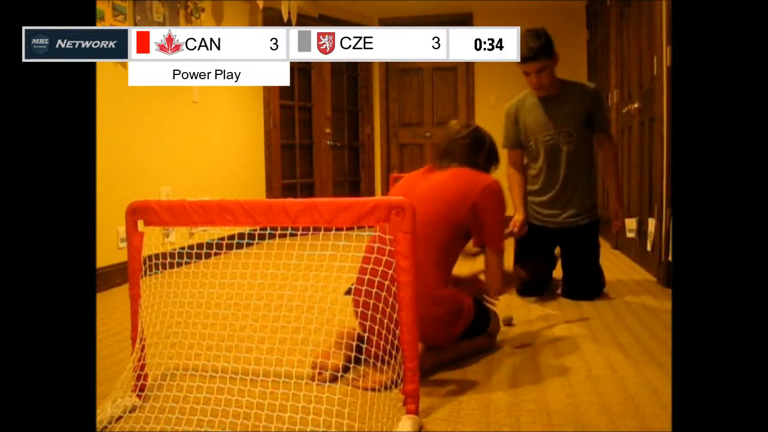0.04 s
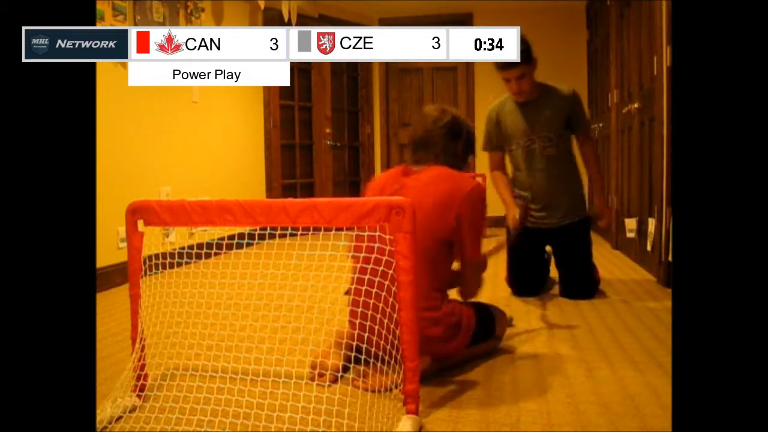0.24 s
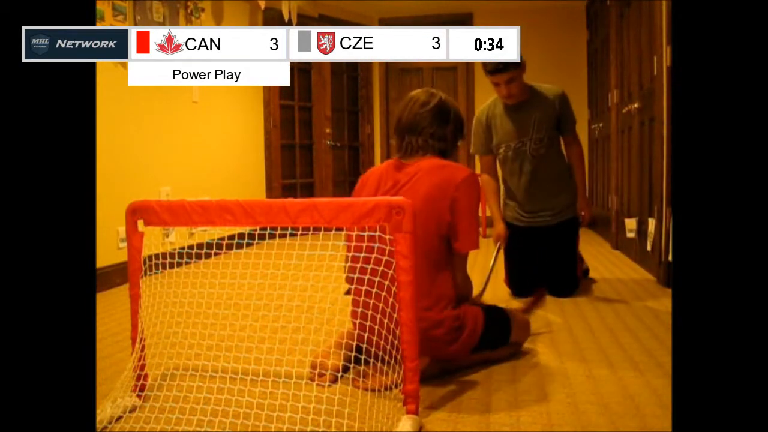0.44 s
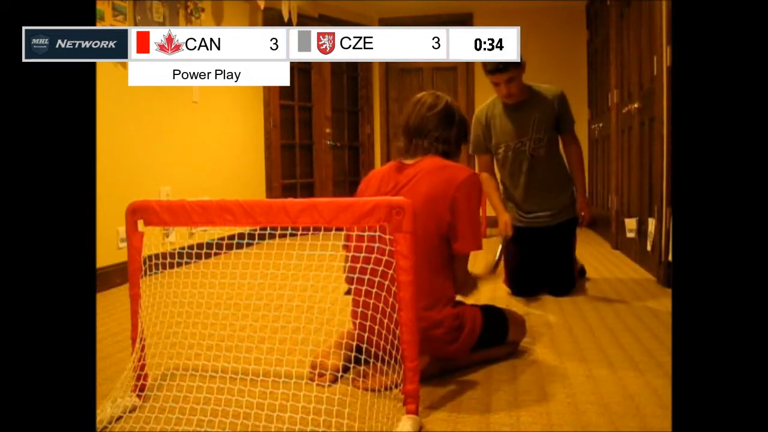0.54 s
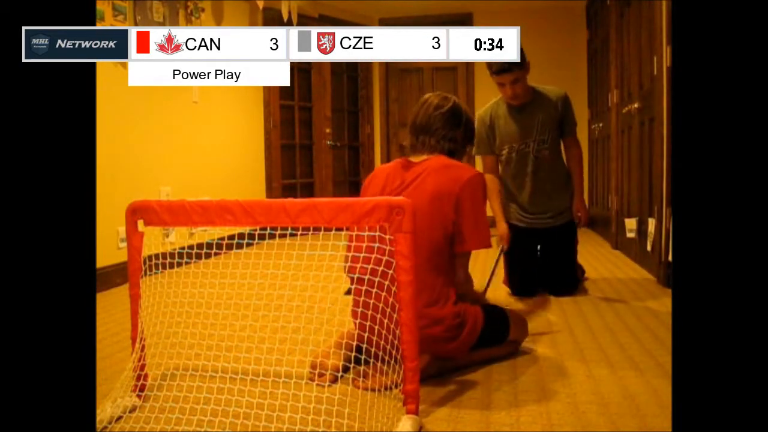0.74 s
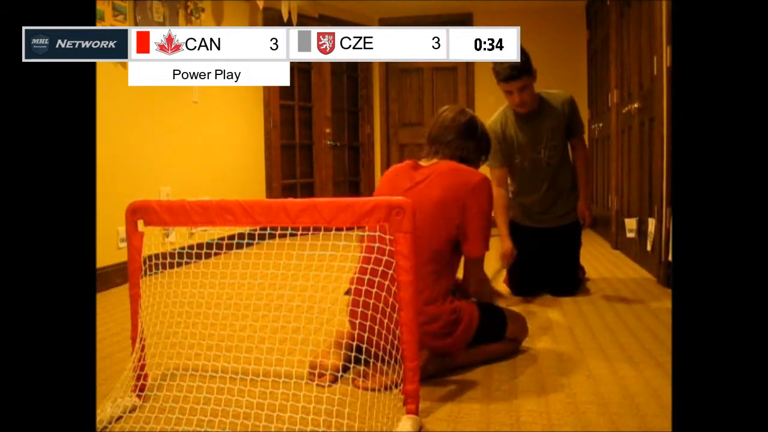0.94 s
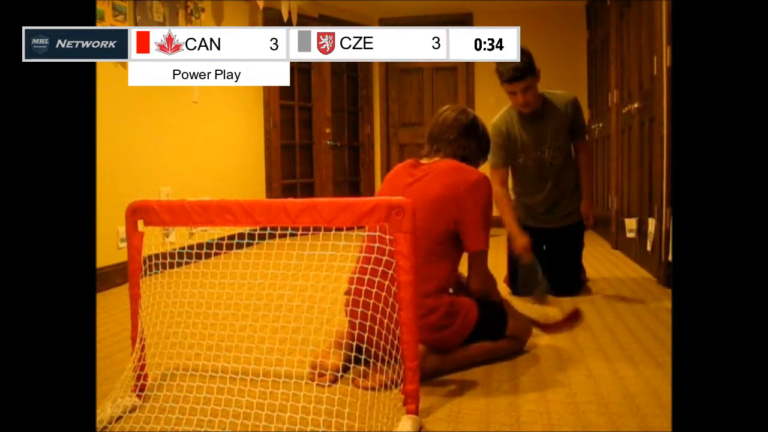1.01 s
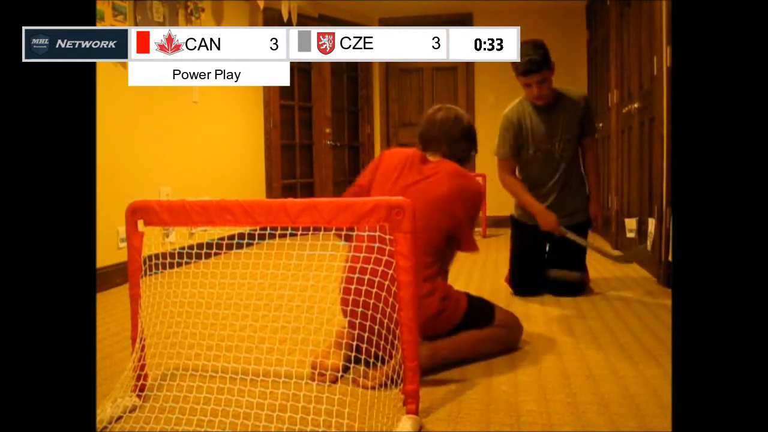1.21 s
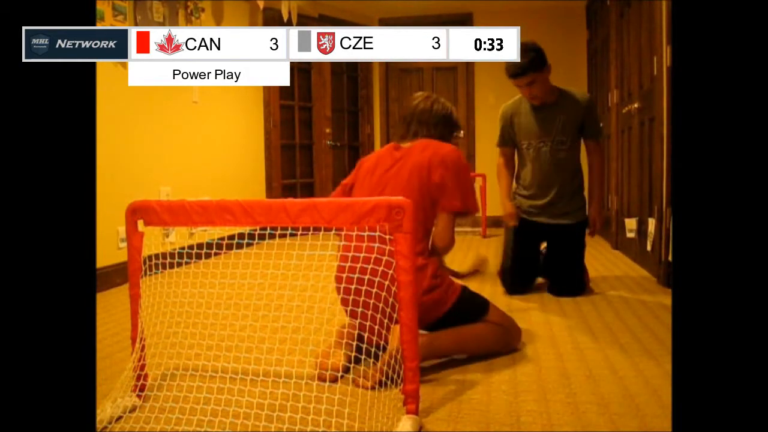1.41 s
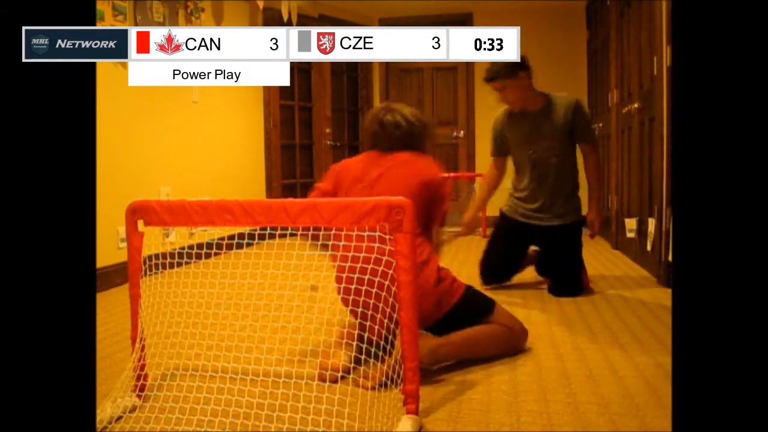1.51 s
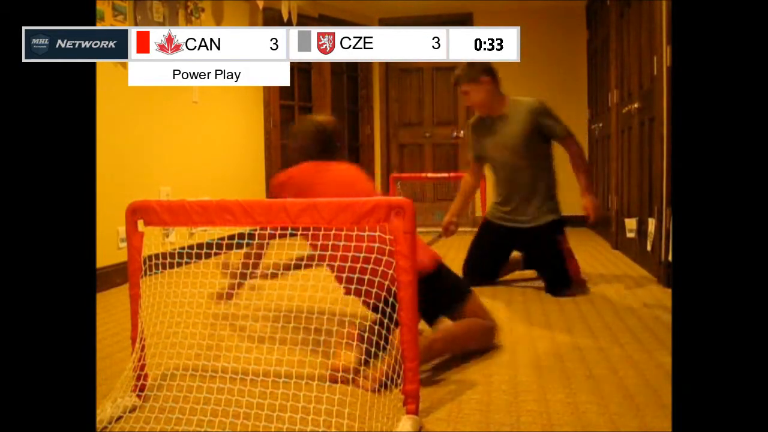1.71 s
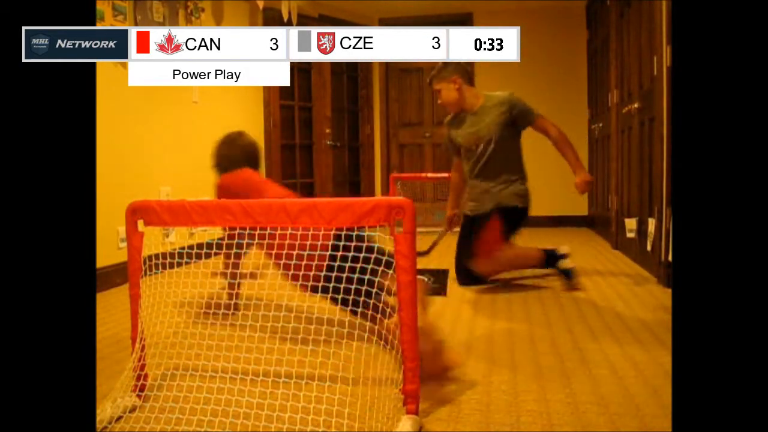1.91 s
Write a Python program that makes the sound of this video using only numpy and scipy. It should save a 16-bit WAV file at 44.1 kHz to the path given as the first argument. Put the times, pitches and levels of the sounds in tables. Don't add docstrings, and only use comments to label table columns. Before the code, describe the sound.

Small plastic hockey sticks strike each other in four bright, sharp cracks with short rattles, between soft knee and blade thuds on carpet, cloth rustling at first and again at the end, in a lively hallway, close camera microphone.

```python
import sys
import numpy as np
from scipy import signal
from scipy.fft import rfft, irfft
from scipy.io import wavfile
from scipy.ndimage import uniform_filter1d, map_coordinates

SR = 44100
rng = np.random.default_rng(int(sys.argv[2]) if len(sys.argv) > 2 else 0)


def gain_from_db(level_db):
    decades = np.asarray(level_db, float) / 20
    return 10 ** decades


def dump_mix(stems):
    frames = np.atleast_2d(stems).T
    limited = np.clip(frames, -1, 1)
    pcm = np.round(limited * 32767).astype(np.int16)
    wavfile.write(sys.argv[1], SR, pcm)


N = 85995


def unit(x):
    return x / np.sqrt(np.mean(x ** 2) + 1e-20)


def along(points, hz):
    f, v = np.transpose(points)
    return np.interp(np.log(hz + 1), np.log(f + 1), v)


def wobble(knots_hz):
    knots = rng.standard_normal(int(N * knots_hz / SR) + 4)
    return map_coordinates(knots, [np.arange(N) * knots_hz / SR])


def rush(spectrum, patchy_db):
    hz, _, z = signal.stft(rng.standard_normal(N), SR, nperseg=512)
    field = uniform_filter1d(rng.standard_normal(z.shape), 6, 0)
    field = uniform_filter1d(field, 8, 1)
    z = z * gain_from_db(patchy_db * unit(field) + along(spectrum, hz)[:, None])
    return unit(signal.istft(z, SR, nperseg=512)[1][:N])


def add(mix, s, x):
    mix[round(s * SR):][:len(x)] += x


# (frequency [Hz], density [dB per Hz])
HUM_COLOUR = [(15, -22.5), (25, -3), (309, -3), (373, -17.5), (1370, -25), (1560, -14), (1740, -26),
              (8830, -39.5), (16000, -62)]
# (frequency [Hz], density [dB per Hz])
HISS_COLOUR = [(3000, -16), (8000, -10), (12000, -3.5), (16000, -4.5)]
HUM_DB, HISS_DB = -56.5, -79


def house():
    hum = gain_from_db(HUM_DB + 0.38 * wobble(15)) * rush(HUM_COLOUR, -0.7)
    return hum + gain_from_db(HISS_DB) * rush(HISS_COLOUR, 0)


# (time [s], effort [dB])
SHUFFLE_EFFORT = [(0, -38.5), (0.201, -40), (0.231, -56.5), (1, -46), (1.05, -43), (1.074, -38.5),
                  (1.1, -67), (1.6, -56), (1.749, -51), (1.95, -43.5)]
# (frequency [Hz], density [dB per Hz])
KNEE_COLOUR = [(15, -38), (25, -14), (96, -9.5), (238, -4.5), (318, -11.5), (393, -11), (772, -14),
               (1110, -12.5), (2500, -24.5), (3250, -50.5), (5500, -120)]
PATCHY_DB, SWELL_DB, GRAIN_DB = 0.8, 0.8, 1.0


def shuffling():
    effort_db = np.interp(np.arange(N) / SR, *np.transpose(SHUFFLE_EFFORT))
    return gain_from_db(effort_db + GRAIN_DB * wobble(60)) * rush(KNEE_COLOUR, PATCHY_DB)


# (time [s], effort [dB])
SCUFF_EFFORT = [(0, -49.5), (.1, -52), (.2, -52.5), (.35, -52.5), (.6, -67.5), (.8, -55), (1.1, -72),
                (1.4, -74.5), (1.58, -69), (1.7, -63), (1.8, -54), (1.83, -49), (1.95, -47.5)]
# (frequency [Hz], density [dB per Hz])
CLOTH_COLOUR = [(700, -28), (1500, -9.5), (2500, 2), (5600, -3), (10000, -11.5), (13500, -17), (16000, -26)]


def scuffing():
    effort_db = np.interp(np.arange(N) / SR, *np.transpose(SCUFF_EFFORT))
    uneven_db = SWELL_DB * wobble(5) + GRAIN_DB * wobble(150)
    return gain_from_db(effort_db + uneven_db) * rush(CLOTH_COLOUR, PATCHY_DB)


# (frequency [Hz], t60 [s])
HALL_T60 = [(100, 0.45), (400, 0.3), (1500, 0.28), (4000, 0.32), (8000, 0.27), (15000, 0.17)]
FIRST_WALL_S, BUILD_S = 0.0011, 0.0037
LATE_DB, LATE_T60_TIMES = -18, 2.42


def hall(x):
    hz, t, z = signal.stft(rng.standard_normal(SR), SR, nperseg=256)
    fall_db = -60 * t / along(HALL_T60, hz)[:, None]
    decay = gain_from_db(fall_db) + gain_from_db(LATE_DB + fall_db / LATE_T60_TIMES)
    tail = signal.istft(z * decay, SR, nperseg=256)[1][:SR]
    late_s = np.maximum(np.arange(SR) / SR - FIRST_WALL_S, 0)
    tail = tail * (1 - np.exp(-late_s / BUILD_S))
    return signal.fftconvolve(x, tail / np.linalg.norm(tail))[:SR]


# (time [s], peak level [dB], pitch [Hz], brightness [dB], hall level [dB])
FLOOR_KNOCKS = [(.003, -25.5, 314, -9, -0.5), (0.08, -45, 202, -39, 18.5), (0.189, -28, 207, -21, -27),
                (.2062, -24, 525, -22, -0.5), (0.411, -26.5, 450, -15, 7), (0.4341, -19.5, 298, -27, 2.5),
                (0.4426, -26, 390, -15, 7.5), (.468, -27.5, 367, -21, 4), (0.8107, -23.5, 385, -11.5, 0),
                (0.8178, -21, 347, -14, -2.5), (.833, -25, 287, -7, 4), (0.8448, -20.5, 370, -40.5, -9),
                (0.8995, -60, 208, -22, -30.5), (1.0765, -23, 335, -39, -48.5),
                (0.981, -34.5, 337, -14, 9.5), (1.0305, -23.5, 592, -15, 4), (1.045, -20, 918, -17.5, 2.5),
                (1.0772, -7.5, 1042, -22, -9.5), (1.1462, -14, 734, -25.5, 1), (1.15, -15.5, 557.4, -26, 5),
                (1.1522, -16, 698, -22, -3.5), (1.193, -32.5, 110, -29.5, 6.5),
                (1.489, -37, 366, -18.5, 4.5), (1.829, -37.5, 323, -34, 13), (1.869, -29.5, 337, -17, -3),
                (1.8983, -26, 575, -17.5, -9), (1.904, -22.5, 515, -19, 2)]
THUD_CYCLES, FLOOR_CUT_HZ = 1.29, 200


def thuds():
    mix, t = np.zeros(N + SR), np.arange(SR // 20) / SR
    for s, db, hz, bright_db, hall_db in FLOOR_KNOCKS:
        u = t * hz / THUD_CYCLES
        push = -2.5 * u * np.exp(-u * u * 2.2) * np.sin(2 * np.pi * hz * t)
        band = signal.butter(3, [1.69 * hz, 3.41 * hz], "band", fs=SR, output="sos")
        pat = signal.sosfilt(band, rng.standard_normal(len(t)))
        knock = gain_from_db(db) * (push + gain_from_db(bright_db + 17.0 - 60 * t / 0.02) * pat)
        add(mix, s, knock)
        low_cut = signal.butter(2, min(FLOOR_CUT_HZ, 1.15 * hz), "high", fs=SR, output="sos")
        add(mix, s, gain_from_db(hall_db) * hall(signal.sosfilt(low_cut, knock)))
    return mix[:N]


RING_DB, RING_BLUR_HZ = 6, 120


def click(colour, rings):
    f = np.fft.rfftfreq(2048, 1 / SR)
    peaks = sum(gain_from_db(RING_DB + db / 2) / (1 + ((f - hz) * 2 / (width + RING_BLUR_HZ)) ** 2)
                for hz, width, db in rings)
    cepstrum = irfft(np.log(gain_from_db(along(colour, f)) * (1 + peaks) + 1e-4))
    cepstrum = np.concatenate([cepstrum[:1], 2 * cepstrum[1:1024], np.zeros(1024)])
    x = irfft(np.exp(rfft(cepstrum)))
    return x / np.linalg.norm(x)


def ring(hz, t60, t):
    return gain_from_db(-60 * t / t60) * np.sin(2 * np.pi * hz * t)


# (time [s], peak level [dB])
CLACKS = [
    (0.2063, 2),
    (0.6129, -7),
    (0.9003, -3.5),
    (1.0774, -3.5),
]
# (frequency [Hz], level [dB], t60 [s])
BLADE_MODES = [
    [(3900, 3, .003), (6140, 7.5, 0.0025), (9900, 3.5, 0.0026), (14300, -6, .003)],
    [(4600, -9.5, .003), (7260, 10, 0.0027), (10120, 3, 0.00307), (12200, -8.5, .003),
     (2900, -10.5, 0.0041)],
    [(2200, -9, .012), (4600, 0, 0.003), (6100, 5.5, 0.0034), (8950, 4.5, .003), (13470, 0.5, .004)],
    [(2850, 5, 0.0037), (5540, -2.5, .002), (8800, 6, 0.0036), (11240, -3.5, 0.0042), (13970, -3.5, 0.0018)],
]
# (frequency [Hz], density [dB per Hz])
CONTACT_COLOUR = [
    [(530, -52.5), (900, -18), (1460, -17), (2360, -13), (3150, -10), (3680, -14), (9650, -10.5),
     (14700, -16), (16000, -48)],
    [(600, -54.5), (1150, -15.5), (1640, -14.5), (2050, -12.5), (2840, -9.5), (3790, -8), (4490, -10.5),
     (12300, -11), (16000, -24)],
    [(900, -55.5), (1500, -15), (1770, -9), (2980, -13), (3300, -7.5), (4680, -6), (6040, -9.5),
     (10300, -7.5), (16000, -15.5)],
    [(410, -40.5), (700, -17.5), (1200, -6.5), (2100, 0), (4800, -1.5), (5260, -1.5), (11400, -5.5),
     (15000, -9.5), (16000, -48)],
]
# (frequency [Hz], width [Hz], level [dB])
STICK_RINGS = [
    [(1600, 60, -6), (2800, 130, -5), (3167, 93, -3.5), (4160, 86, -7), (4560, 220, -0.5),
     (4980, 130, -2.5), (5450, 200, -11.5), (6220, 80, -3), (6750, 130, -4.5), (7450, 81, -3),
     (8450, 60, -7), (9600, 120, -3.5), (10500, 110, -7)],
    [(1673, 83, -4.5), (2870, 250, -1.5), (4270, 51, -11.5), (4660, 170, -4), (5010, 71, -7),
     (5360, 72, -5), (6500, 330, -8), (7740, 42, -6), (8150, 47, -10), (10400, 81, -2.5), (12500, 68, -12),
     (12800, 68, -11.5)],
    [(2150, 160, -4), (2913, 41, 5.5), (3757, 51, -0.5), (4590, 40, -5.5), (5600, 38, 1.5), (6030, 30, -14),
     (6580, 86, 2), (7470, 48, -18), (8100, 260, -8), (9900, 31, 0), (10300, 72, -1.5), (11750, 260, -6)],
    [(2730, 38, -16.5), (3100, 83, -6.5), (3854, 59, -7), (4580, 69, -7.5), (4800, 48, -4.5),
     (5850, 33, -0.5), (6790, 63, -18), (7430, 93, -4.5), (8600, 130, 1.5), (9730, 53, -5),
     (9700, 50, -11.5), (11320, 130, -23)],
]
CLACK_HALL_DB = [-14.5, -7, -8.5, -13]
# (delay [s], level [dB])
ECHOES = [(.0017, -12), (.0029, -14), (.0062, -13), (.0095, -20)]
# (time [s], peak level [dB], frequency [Hz], t60 [s])
CHATTER = [(.2082, -4.5, 3120, .006), (.2093, 2, 4870, .006), (.2118, -17.5, 5060, .008),
           (.2158, -7.5, 5400, .01), (.2192, -8.5, 3320, .008), (.6195, -26, 6940, .005),
           (.6222, -12.5, 3040, .01), (.6258, -20, 2900, .012), (.6345, -16, 4450, .012),
           (.9018, -14, 9300, .003), (.9028, -1, 5140, .005), (.9062, -11, 4600, .006),
           (.908, -4.5, 5100, .006), (.9145, -18.5, 3473, .015), (1.0784, -4, 9000, .003),
           (1.0832, -9, 7700, .005), (1.0834, -20.5, 11200, .004), (1.0865, -11.5, 3060, .012),
           (.9006, -29.5, 2210, 0.28), (0.8994, -29, 2930, 0.28), (.9008, -36, 3790, 0.19),
           (0.9012, -31, 4590, 0.15), (0.902, -28, 6712, 0.23), (0.9014, -30, 5140, .2),
           (.207, -35, 1600, 0.24), (0.2078, -26.5, 3260, 0.28), (.2072, -25, 4960, 0.31),
           (0.207, -30, 4560, 0.29), (1.49, -57.5, 9460, .02), (1.49, -54, 3560, 0.018),
           (0.6136, -32, 2870, 0.26), (0.6124, -31.5, 3160, 0.27), (0.6153, -29, 4700, 0.23),
           (1.0774, -9.5, 2000, 0.0022), (1.079, -21.5, 2250, .04), (1.9, -37, 3020, .01),
           (1.9045, -32, 2800, .01)]
CRACK_DB, RISE_S, SIDE_CUT_HZ = 0, 0.00022, 1700
RATTLE_DB, RATTLE_T60_S = -8.5, 0.037


def sticks():
    mix, t = np.zeros(N + SR), np.arange(SR // 20) / SR
    small = signal.butter(3, SIDE_CUT_HZ, "high", fs=SR, output="sos")
    rise = 1 - np.exp(-t / RISE_S)
    clacks = zip(CLACKS, BLADE_MODES, CONTACT_COLOUR, STICK_RINGS, CLACK_HALL_DB)
    for (s, db), blade, colour, rings, hall_db in clacks:
        pulse = click(colour, rings)
        modes = sum(gain_from_db(level) * ring(hz, t60, t) for hz, level, t60 in blade)
        grains = np.convolve(rng.standard_normal(len(t)), pulse)[:len(t)]
        rattle = gain_from_db(RATTLE_DB - 60 * t / RATTLE_T60_S) * grains
        blow = signal.sosfilt(small, modes * rise)
        add(blow, RISE_S, gain_from_db(CRACK_DB) * pulse)
        add(mix, s, gain_from_db(db) * (blow + rattle * rise))
        for (delay, echo_db), sign in zip(ECHOES, rng.choice([-1, 1], len(ECHOES))):
            add(mix, s + delay, sign * gain_from_db(db + echo_db) * blow)
        add(mix, s, gain_from_db(db + 24.0 + hall_db) * hall(pulse))
    t = np.arange(SR // 2) / SR
    for s, db, hz, t60 in CHATTER:
        add(mix, s, gain_from_db(db) * ring(hz, t60, t) * (1 - np.exp(-t / RISE_S)))
    return mix[:N]


def scene():
    return (house() + shuffling() + scuffing() + thuds() + sticks())[None]


DUCK_FROM_DB, DUCK_SLOPE, DUCK_S = -27, 0.15, 0.0084


def duck(x):
    k = 1 / (DUCK_S * SR)
    level_db = 10 * np.log10(signal.lfilter([k], [1, k - 1], x ** 2) + 1e-12)
    return x * gain_from_db(-DUCK_SLOPE * np.maximum(level_db - DUCK_FROM_DB, 0))


# (time [s], length [s], threshold under the frame's top [dB])
STARVED = [
    (0.277, 0.02, -15),
    (0.73, 0.013, -11),
    (0.963, 0.031, -11),
    (1.259, 0.0095, -20.5),
    (1.751, 0.0073, -22),
]
LOCAL_DB, WEAK_DB, STRONG_DB = 1, -16, 2.5


def starve(x):
    _, t, z = signal.stft(x, SR, nperseg=1024, noverlap=768)
    size = uniform_filter1d(np.abs(z), size=5, axis=1)
    size = uniform_filter1d(size, size=5, axis=2)
    near = gain_from_db(LOCAL_DB) * uniform_filter1d(size, size=41, axis=1)
    for s, length, db in STARVED:
        when = np.exp(-((t - s) / length * 2) ** 4)
        threshold = np.maximum(near, gain_from_db(db) * size.max(axis=1, keepdims=True))
        weak = 1 / (1 + (size / threshold) ** 14)
        z = z * gain_from_db(when * (WEAK_DB * weak + STRONG_DB * (1 - weak)))
    return signal.istft(z, SR, nperseg=1024, noverlap=768)[1][:, :N]


def top_cut(x):
    return signal.sosfilt(signal.butter(12, 16640, fs=SR, output="sos"), x)


TOP_HZ, CLIP_TOP, CLIP_HARD = 15850, 1.9, 5


def record(dry):
    band_limit = signal.cheby2(12, 50, TOP_HZ + 400, fs=SR, output="sos")
    x = starve(duck(signal.sosfilt(band_limit, dry)))
    mix = x / (1 + np.abs(x / CLIP_TOP) ** CLIP_HARD) ** (1 / CLIP_HARD)
    return top_cut(mix)


dry = scene()
out = record(dry)
dump_mix(out)
```